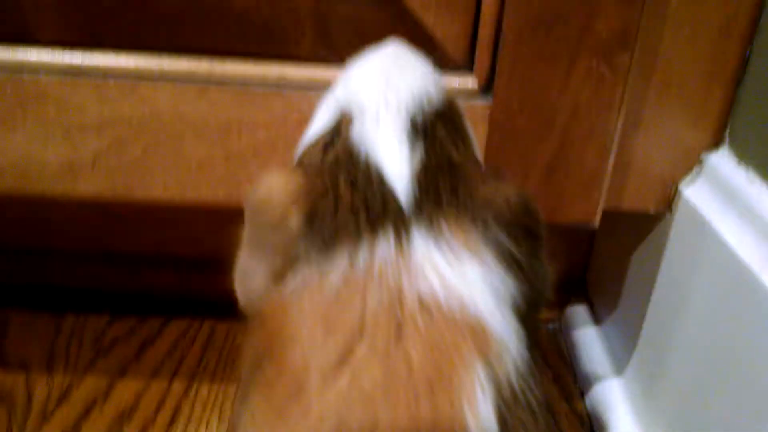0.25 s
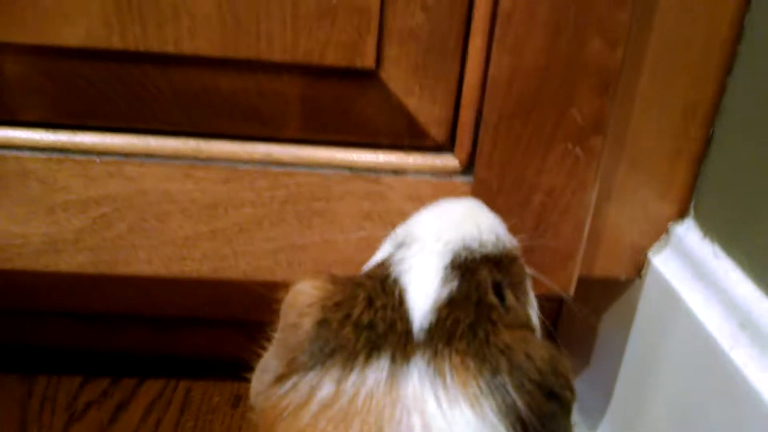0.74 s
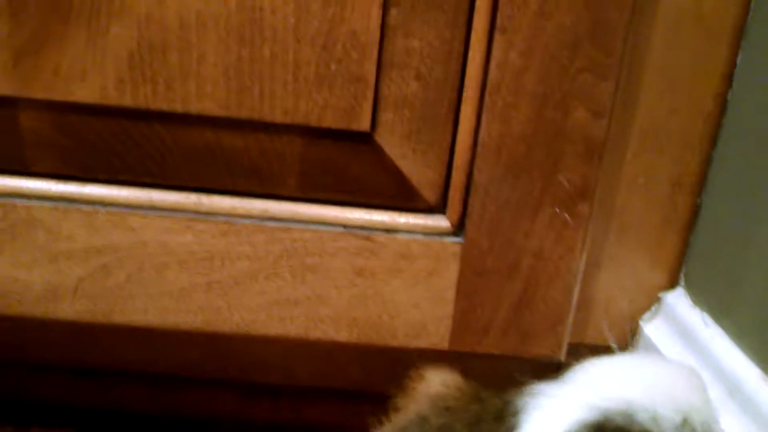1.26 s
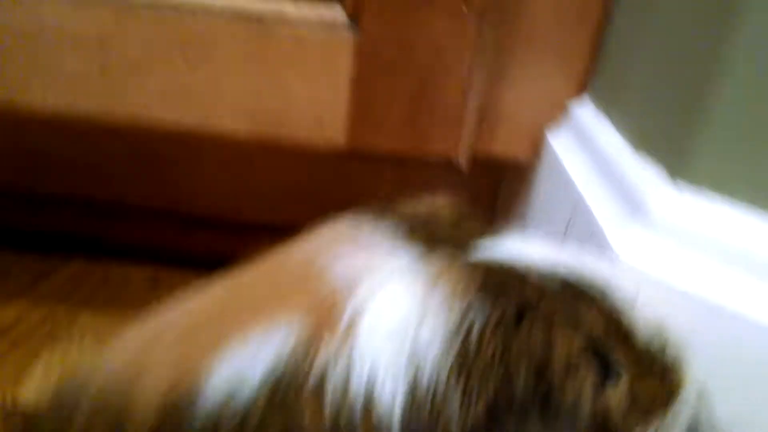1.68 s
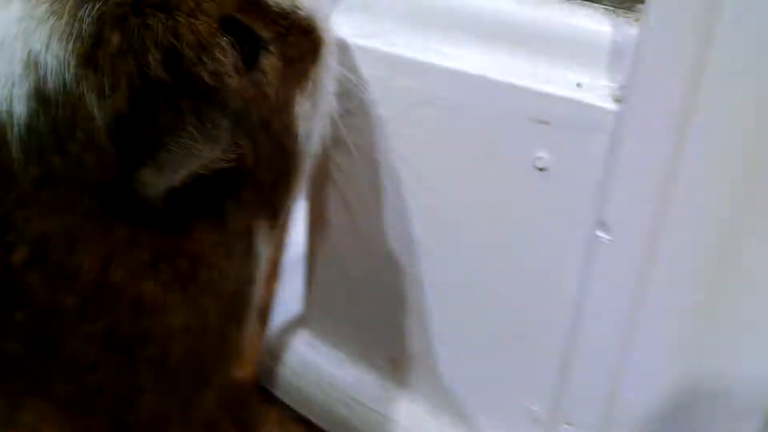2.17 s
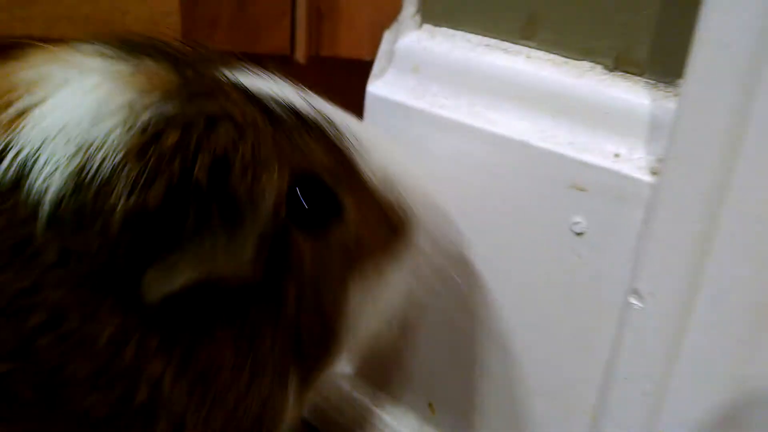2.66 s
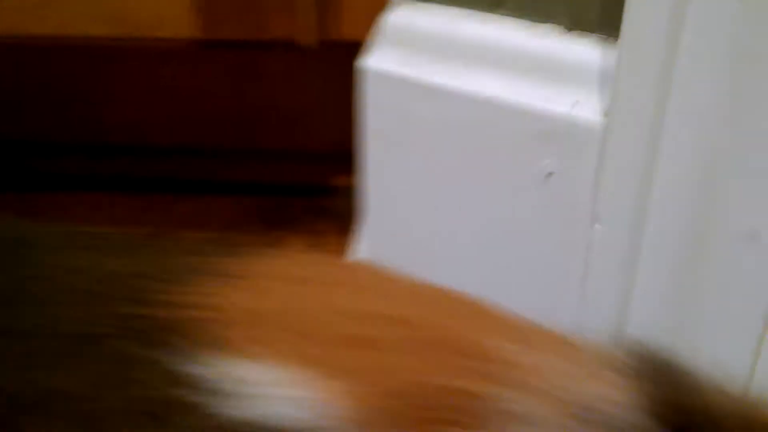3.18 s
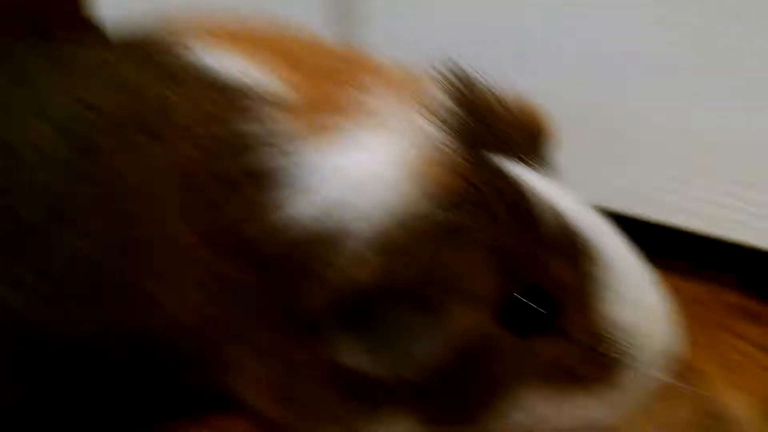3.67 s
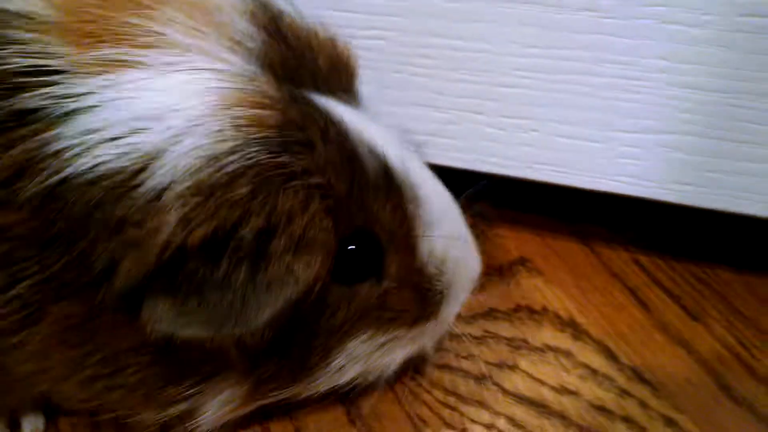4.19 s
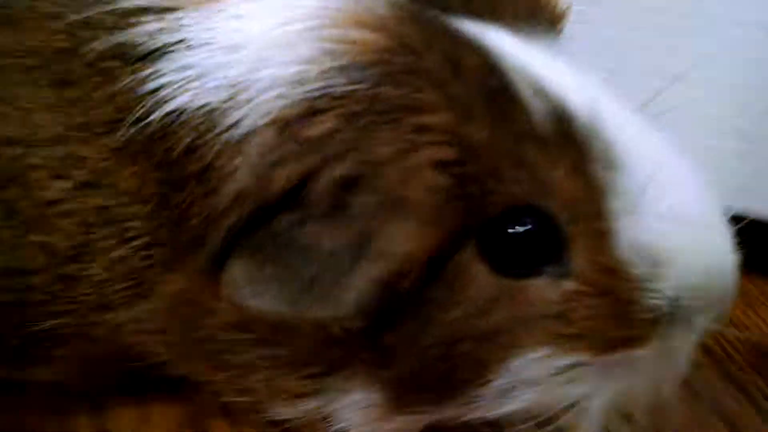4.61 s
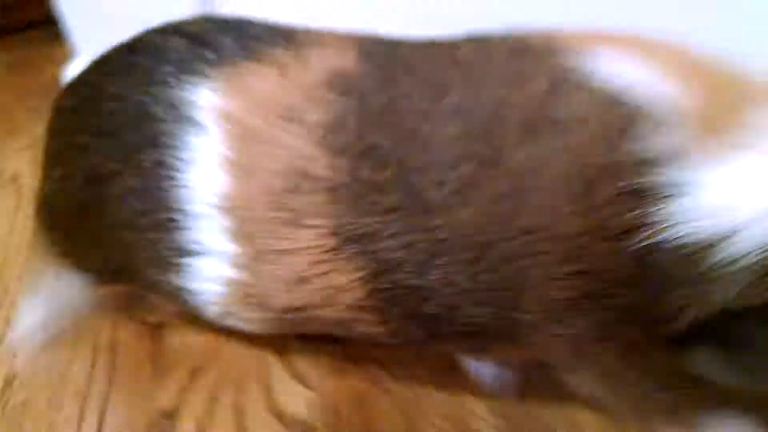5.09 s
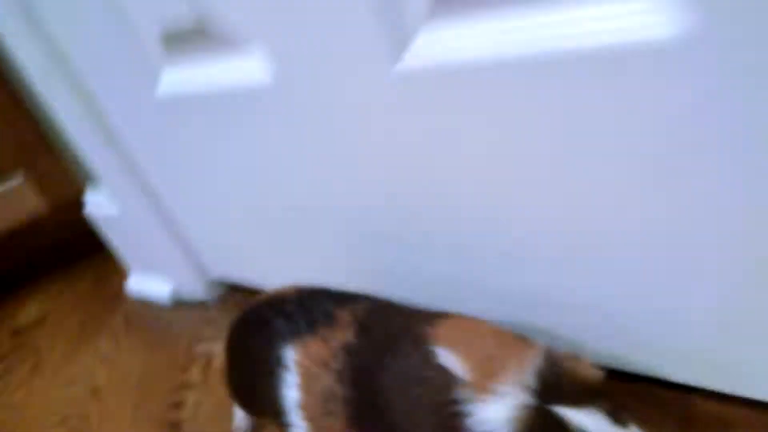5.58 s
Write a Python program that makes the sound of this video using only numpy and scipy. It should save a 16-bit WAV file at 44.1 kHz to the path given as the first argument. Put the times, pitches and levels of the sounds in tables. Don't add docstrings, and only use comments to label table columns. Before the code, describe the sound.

In a quiet kitchen with a low refrigerator hum and faint hiss, a guinea pig starts nearly silent, with one nail flick. Three tiny chirps come before two seconds, then claw ticks thicken, with a fourth upward chirp just after three. Scuffs and clicks grow into a loud scurry with soft thumps and a brushed door panel. Close handheld stereo microphone, jolted near the end.

```python
import sys
import numpy as np
from scipy import signal
from scipy.fft import rfft, irfft, next_fast_len
from scipy.io import wavfile
from scipy.ndimage import uniform_filter1d

SR = 44100
rng = np.random.default_rng(int(sys.argv[2]) if len(sys.argv) > 2 else 0)


def digitize_waveform(pressure):
    field = np.atleast_2d(pressure).T
    bounded = np.clip(field, -1, 1)
    quanta = np.round(bounded * 32767).astype(np.int16)
    wavfile.write(sys.argv[1], SR, quanta)


def invert_db(level):
    return 10 ** (np.asarray(level, dtype=float) / 20)


N = 257984


def evened(x):
    return x / np.sqrt(np.mean(x ** 2) + 1e-20)


def read(points, hz):
    f, value = np.transpose(points)
    return np.interp(np.log(hz + 1), np.log(f + 1), value)


def over_time(points):
    return np.interp(np.arange(N) / SR, *np.transpose(points))


def add(mix, s, sound):
    part = mix[..., round(s * SR):][..., :sound.shape[-1]]
    part += sound[..., :part.shape[-1]]


def band(x, lo_hz, hi_hz, order=2):
    sections = signal.butter(order, [lo_hz, hi_hz], "bandpass", fs=SR, output="sos")
    return signal.sosfilt(sections, x)


def slow(hz):
    steps = rng.standard_normal(N // 64 + 2)
    steps = signal.lfilter(*signal.butter(2, hz * 128 / SR), steps)
    return evened(np.interp(np.arange(N) / 64, np.arange(len(steps)), steps))


def resonate(x, hz, width):
    turn = np.exp(2j * np.pi * np.cumsum(hz * np.ones(x.shape[-1])) / SR)
    r = np.exp(-np.pi * width / SR)
    return 2 * (turn * signal.lfilter([1 - r], [1, -r], x / turn)).real


def diffuse(spectrum, patchy_db):
    # (frequency [Hz], likeness [0-1])
    likeness = [(60, 0), (300, 0.44), (700, 0.4), (1300, 0.35), (2000, 0), (3000, 0)]
    frames, hz = N // 256 + 5, np.fft.rfftfreq(1024, 1 / SR)
    a, b, c, d, patches = rng.standard_normal((frames, 513, 5)).T
    patches = uniform_filter1d(patches, size=10, axis=0)
    patches = evened(uniform_filter1d(patches, size=12, axis=1))
    same = np.clip(read(likeness, hz), 0, 1)[:, None]
    front = a + 1j * b
    back = same * front + np.sqrt(1 - same ** 2) * (c + 1j * d)
    z = np.array([front, back]) * invert_db(read(spectrum, hz)[:, None] + patchy_db * patches)
    return evened(signal.istft(z, nperseg=1024, noverlap=768)[1][:, :N])


def refrigerator():
    compressor_db = [-12.5, -10, -14, -6.5, -12.5, -8, -19.5, -12, -24.5, -14]
    mains_db = [-2.5, -19.5, -17, -13, -12, -12]
    t, hum = np.arange(N) / SR, np.zeros((2, N))
    for hz, levels, waver_db in ((52.8, compressor_db, 2.5), (59.2, mains_db, 1.2)):
        for k, db in enumerate(levels, 1):
            phase = 2 * np.pi * (k * hz * t + rng.random()) + 0.11 * k * slow(1.96)
            gain = invert_db(db + 2 + waver_db * slow(4.3))
            hum += gain * np.sin(phase + np.array([[0], [.8]]))
    return hum


def appliance():
    # (frequency [Hz], density [dB per Hz])
    drone_colour = [(35, -8), (100, -7), (200, -1), (400, -0.5), (630, -11.5), (1000, -17), (2100, -24),
                    (5000, -40.5)]
    # (time [s], level [dB])
    nearness = [(0, -45), (.31, -48), (1.1, -49), (2.1, -46.5), (2.74, -48.5), (3.3, -46), (4.6, -46),
                (5, -47), (5.39, -44.5), (5.56, -49.5), (5.85, -44.5)]
    # (time [s], gain [dB])
    hum_gain = [(0, -2.5), (5.35, 1.5), (5.55, 4), (5.85, -0.5)]
    # (time [s], level [dB])
    fan_level = [(0, -65.5), (1.7, -65), (2, -57), (4.9, -58.5), (5.85, -53.5)]
    drone = invert_db(-1.5) * diffuse(drone_colour, patchy_db=1.57)
    hum = invert_db(over_time(hum_gain)) * refrigerator()
    fan = evened(band(rng.standard_normal((2, N)), 438, 628))
    return invert_db(over_time(nearness)) * (drone + hum) + invert_db(over_time(fan_level)) * fan


def air():
    # (frequency [Hz], density [dB per Hz])
    hiss_colour = [(600, 1), (2000, 2), (4000, 3), (6000, 1.5), (9000, 1), (12000, -2.5), (13000, -3.5),
                   (15500, -4.5)]
    # (time [s], level [dB])
    stir = [(0, -65.5), (2.8, -66.5), (3.2, -64), (3.7, -65.5), (4.46, -63), (4.6, -58.5), (4.97, -54),
            (5.26, -53.5), (5.39, -47), (5.56, -50), (5.85, -53.5)]
    # (frequency [Hz], level [dB])
    whine_hz, whine_db = (9800, -86)
    hiss = invert_db(over_time(stir) + .5 * slow(35)) * invert_db(5.0) * diffuse(hiss_colour, patchy_db=1.1)
    whine = invert_db(whine_db) * np.sin(2 * np.pi * whine_hz * np.arange(N) / SR)
    return hiss + whine * np.array([[1], [-1]])


def hand():
    # (time [s], level [dB])
    sway_level = [(0, -60), (3.2, -72), (5.3, -53), (5.53, -39), (5.65, -39), (5.85, -48)]
    # (time [s], peak [dB], frequency [Hz], t60 [s])
    jolt = (5.524, -25, 31, .22)
    sway = evened(band(rng.standard_normal(N), 4.9, 37)) * invert_db(over_time(sway_level))
    add(sway, *knock(*jolt))
    return sway * np.array([[1], [-.6]])


def claw(s, db, hz, board_db, top_db, contact_ms=1):
    u = np.arange(1500) / SR / np.clip(contact_ms / 1000, .0002, .004)
    noise = rng.standard_normal((2, 1500))
    chatter = noise * abs(noise) ** 1.56 * u ** 1.33 * np.exp(-u)
    nail = band(resonate(chatter, hz, 4400), 2260, 9900)
    board = band(chatter[[0, 0]], 990, 4030)
    top = band(chatter, 9600, 21400)
    parts = ((nail, 0), (board, board_db), (top, top_db + 0.45))
    return s, invert_db(db + 1.0) * sum(invert_db(share) * p / abs(p).max() for p, share in parts)


def knock(s, db, hz, t60):
    t = np.arange(9000) / SR
    return s, invert_db(db - 60 * t / t60) * np.sin(2 * np.pi * hz * t) * np.minimum(t * hz * 2, 1)


def squeak(start, length, from_hz, hz, db):
    # (frequency [Hz], gain [dB])
    throat = [(500, 6.5), (700, 0), (890, 5.5), (1400, -4.5), (1800, -13.5), (2100, -13), (2700, -17),
              (3600, -42)]
    glide_s, overshoot, settle_s = 0.0157, 0.025, 0.0068
    attack_s, release_s = 0.007, 0.0056
    t = np.arange(0, length, 1 / SR)
    jump = np.log2(hz / from_hz)
    since = np.maximum(t - glide_s, 0)
    slide = np.sin(np.pi / 2 * np.minimum(t / glide_s, 1)) ** 2
    held = hz * (1 + overshoot * np.exp(-since / settle_s))
    pitch = from_hz + (held - from_hz) * slide
    swell_db = 4000 * (np.minimum(jump, 0.34) - 0.28) * since
    level = db + swell_db - 17 * jump * (1 - slide)
    closing_db = -400 * since - 6.5 * (1 - slide)
    wobble = 0.029 * evened(uniform_filter1d(rng.standard_normal(len(t)), size=90))
    turns = 2 * np.pi * np.cumsum(pitch * (1 + wobble)) / SR
    voice = np.zeros(len(t))
    for k in range(1, 5):
        harmonic_db = level + 2 + read(throat, k * pitch) + (k - 1.5) * closing_db
        voice += invert_db(harmonic_db) * np.sin(k * (turns + 0.33))
    return start, voice * np.minimum(t / attack_s, 1) * np.minimum((length - t) / release_s, 1)


def scuff(s, rise, fall, db, hz):
    t = np.arange(-rise, fall, 1 / SR)
    drop_db = -17 * np.where(t < 0, -t / rise, t / fall)
    grain_db = 4.0 * evened(uniform_filter1d(rng.standard_normal(len(t)), size=70))
    slips = rng.standard_normal((2, len(t))) * invert_db(grain_db)
    rub = evened(band(resonate(slips, hz, 3800), 1970, 9600))
    rub += invert_db(-8.0) * evened(band(slips, 770, 5100))
    fizz = evened(band(slips, 8500, 13700))
    sliding = invert_db(drop_db) * rub + invert_db(0.82 * drop_db) * fizz
    return s - rise, invert_db(db + 6.0) * sliding * signal.windows.tukey(len(t), .1)


def rattle():
    # (time [s], level [dB], centre [Hz], half width [Hz])
    brushed = [
        (5.512, -45, 1700, 300),
        (5.53, -42, 1720, 300),
        (5.56, -50.5, 1720, 400),
        (5.66, -54.5, 1640, 402),
    ]
    s, *columns = np.transpose(brushed)
    t = np.arange(s[0], s[-1], 1 / SR)
    db, hz, width = (np.interp(t, s, c) for c in columns)
    lo_hz, hi_hz = hz.mean() - width.mean(), hz.mean() + width.mean()
    ring = evened(band(rng.standard_normal(len(t)), lo_hz, hi_hz))
    ring += invert_db(-2) * evened(band(rng.standard_normal(len(t)), 560, 810))
    return s[0], invert_db(db) * ring * np.minimum((t[-1] - t) / 0.01, 1)


def footfalls():
    # (time [s], peak [dB], nail ring [Hz])
    toes = [(0.149, -48, 3980), (0.165, -38.5, 4600), (1.0924, -54, 7550), (3.5838, -47, 4680),
            (5.1761, -38, 4300), (5.237, -31.5, 6000)]
    # (time [s], peak [dB], nail ring [Hz], board share [dB], top share [dB])
    snaps = [
        (0.4647, -26.5, 3780, -3.5, -4),
        (4.4725, -32, 4580, -2, 7),
        (5.214, -15.5, 4260, -6, -14),
        (5.5099, -26, 4500, 0, -14),
    ]
    # (time [s], peak [dB], nail ring [Hz])
    ticks = [(0.9794, -50, 4820), (1.66, -41, 4410), (2.0072, -41.5, 4390), (2.1793, -42.5, 4510),
             (2.2129, -45, 4460), (2.951, -33, 7500), (3.102, -40, 4170), (3.1163, -31.5, 4300),
             (3.197, -39, 4830), (3.315, -27.5, 6350), (3.387, -30, 5300), (3.4433, -39.5, 3730),
             (3.456, -38.5, 6760), (3.719, -43.5, 4190), (3.935, -31.5, 7600), (4.143, -34, 4990),
             (4.4236, -39, 4090), (4.4935, -26, 4280), (4.6292, -29.5, 4800), (4.7406, -26, 8100),
             (5.1936, -32, 4920)]
    # (time [s], peak [dB], nail ring [Hz], board share [dB], top share [dB])
    claws = [(1.7456, -24.5, 6200, -17, 2), (1.7495, -28, 4700, -10.5, -30), (3.1664, -33.5, 5390, -12, -3),
             (3.181, -32, 4720, -19, 4), (3.277, -23, 4800, -24, 2), (4.014, -36, 4200, -18, 8),
             (4.2606, -29.5, 4130, -31, 2), (4.6137, -25, 5000, -13, 4.5), (4.8341, -27, 5330, -19, -21),
             (4.9873, -20, 5130, -18.5, -1), (5.327, -16.5, 5500, -12.5, 2), (5.671, -26, 6230, -10.5, 5),
             (5.7162, -25.5, 5430, -10, -7), (5.821, -14.5, 4500, -19, 1.5)]
    # (time [s], peak [dB], nail ring [Hz], board share [dB], top share [dB])
    drags = [(3.0115, -24, 4530, -22, 1.5), (4.0078, -32, 5940, -16, -9), (4.1548, -20.5, 4830, -21, -21),
             (4.4975, -14, 4160, -17, -20), (4.5074, -22, 5130, -12, -2), (5.2544, -25, 7340, -10, -14),
             (5.276, -30, 3730, -4, 2), (5.5967, -20, 5300, -10, 2)]
    # (strongest time [s], rise [s], fall [s], level [dB], centre [Hz])
    scuffs = [(2.955, 0.014, 0.018, -54.5, 6600), (3.074, 0.032, 0.036, -58, 5030),
              (3.12, 0.047, 0.029, -53.5, 4960), (3.337, 0.03, .06, -51, 6400),
              (3.644, .012, 0.01, -54.5, 4960), (3.923, 0.031, 0.036, -53.5, 7500),
              (4.161, .003, 0.011, -50, 4800), (4.432, 0.025, 0.013, -56.5, 4960),
              (4.516, 0.0036, .02, -56, 4770), (4.758, 0.032, 0.027, -47.5, 5200),
              (4.905, 0.042, 0.029, -55, 5320), (5.216, 0.021, 0.032, -45, 4900),
              (5.326, 0.033, 0.05, -47.5, 5460), (5.5, .4, 0.11, -50.5, 5130),
              (5.66, 0.051, 0.12, -57, 5300), (5.722, 0.014, 0.018, -48, 5230),
              (5.79, 0.037, 0.051, -54, 5340)]
    feet = np.zeros((2, N))
    for row in toes:
        add(feet, *claw(*row, board_db=0.5, top_db=-15))
    for row in snaps:
        add(feet, *claw(*row, contact_ms=0.37))
    for row in ticks:
        add(feet, *claw(*row, board_db=-14.5, top_db=2))
    for row in claws:
        add(feet, *claw(*row))
    for row in drags:
        add(feet, *claw(*row, contact_ms=1.63))
    for row in scuffs:
        add(feet, *scuff(*row))
    add(feet, *rattle())
    return feet


def voice_and_knocks():
    # (time [s], peak [dB], frequency [Hz], t60 [s])
    short_taps = [(0.163, -41, 956, 0.017), (1.092, -40.5, 780, 0.014), (1.287, -26.5, 686, 0.011),
                  (1.5458, -27, 900, 0.005), (3.2905, -23.5, 590, .02), (2.807, -31, 480, 0.01),
                  (2.862, -27, 550, 0.0056), (2.924, -30.5, 543, 0.0084), (3.014, -47, 528, 0.012),
                  (3.166, -28.5, 507, 0.014), (3.51, -45, 538, 0.013), (3.569, -37, 1340, 0.012),
                  (3.815, -38, 650, 0.012), (5.32, -32, 900, 0.016), (5.508, -27.5, 1660, 0.016),
                  (0.465, -27.5, 2260, 0.0033), (0.4703, -31.5, 1800, 0.0034), (1.746, -34, 1060, 0.01),
            (2.809, -33.5, 910, 0.0083), (3.168, -37, 900, 0.0094), (4.157, -45.5, 1780, 0.052),
            (4.503, -40.5, 1945, 0.085), (5.215, -28.5, 2390, 0.023), (5.216, -24.5, 476, .025)]
    # (start [s], length [s], starting pitch [Hz], held pitch [Hz], effort [dB])
    squeaks = [
        (1.293, 0.04, 625, 749, -35.5),
        (1.545, 0.036, 577, 672, -37),
        (1.632, 0.023, 513, 677, -37),
        (3.289, 0.039, 575, 880, -38),
    ]
    # (time [s], peak [dB], frequency [Hz], t60 [s])
    knocks = [(3.868, -24.5, 258, 0.016), (3.891, -32.5, 313, 0.038), (5.213, -26, 357, 0.041),
              (5.304, -24.5, 263, 0.032), (5.312, -35, 202, 0.028), (5.348, -24, 82, 0.043),
              (5.351, -23, 368, 0.032), (5.362, -18.5, 227, 0.032), (5.375, -16.5, 183, 0.015),
              (5.384, -22.5, 129, 0.029), (5.4, -31, 110, 0.04), (5.334, -28, 258, 0.047),
              (5.425, -36, 340, 0.033)]
    voice = np.zeros((2, N))
    for row in squeaks:
        add(voice, *squeak(*row))
    for row in knocks + short_taps:
        add(voice, *knock(*row))
    return voice * invert_db(np.array([[-1.5], [1.5]]))


def kitchen(x, t60):
    echoes = np.zeros((2, 12000))
    at = np.arange(120, 11980, 20) + rng.integers(0, 20, (2, 593))
    np.put_along_axis(echoes, at, rng.choice([-1., 1.], at.shape), 1)
    tail = echoes * invert_db(-60 * np.arange(12000) / SR / t60)
    tail = signal.lfilter([.6], [1, -.4], tail)
    return signal.fftconvolve(x, tail / np.linalg.norm(tail[0]), axes=1)[:, :N]


def scene():
    room = appliance() + air() + hand()
    feet, voice = footfalls(), voice_and_knocks()
    echoes = invert_db(-19.0) * kitchen(voice, t60=0.37) + invert_db(-11.0) * kitchen(feet, t60=0.15)
    return voice + feet + echoes + room


def roll_off(x):
    return signal.sosfilt(signal.butter(12, 16820, fs=SR, output="sos"), x)


def record(dry):
    # (frequency [Hz], share [0-1])
    subtracted = [(450, 0.15), (900, 0.33), (1500, 0.56), (3100, 0.97), (4600, 0.5), (6200, .22),
                  (11000, 0.38), (14000, .86)]
    # (frequency [Hz], level [dB])
    left_lean = [(100, -3.5), (900, -2), (1400, -0.5), (2400, 0), (3200, 0)]
    # (frequency [Hz], phase [radians])
    right_turn = [(6300, 0), (9600, 3.05), (14000, 3.14)]
    # (frequency [Hz], level [dB])
    circuit_colour = [(3500, 6.5), (6000, 1), (14000, -14)]
    # (frequency [Hz], level [dB])
    band_edge = [(15400, -0.5), (15620, -22), (16800, -40)]
    size = next_fast_len(N + 64)
    hz = np.fft.rfftfreq(size, 1 / SR)
    front, back = rfft(dry, size)
    share = np.clip(read(subtracted, hz), 0, .98)
    cross = share * np.exp(-2j * np.pi * hz * 14.25 / SR)
    lean = invert_db(read(left_lean, hz) / 2)
    left = (front - cross * back) * lean
    right = (back - cross * front) * np.exp(-1j * read(right_turn, hz)) / lean
    sides = np.array([left, right])
    sides += invert_db(-65.5 + read(circuit_colour, hz)) * rfft(rng.standard_normal((2, N)), size)
    sides *= invert_db(read(band_edge, hz)) / np.sqrt(1 + share ** 2)
    return roll_off(irfft(sides, size)[:, :N])


dry = scene()
out = record(dry)
digitize_waveform(out)
```